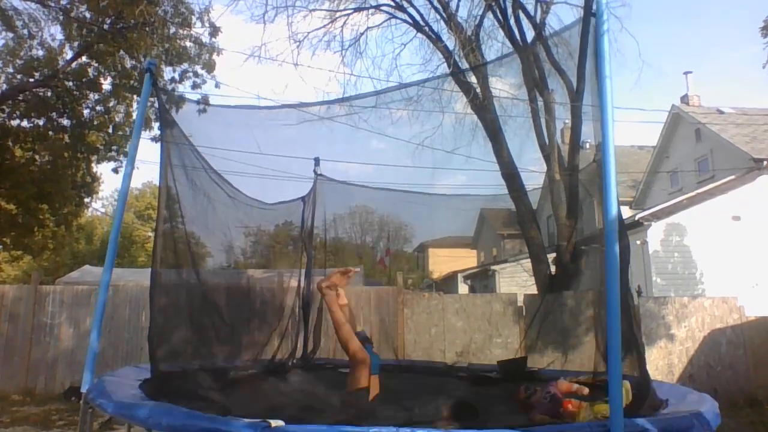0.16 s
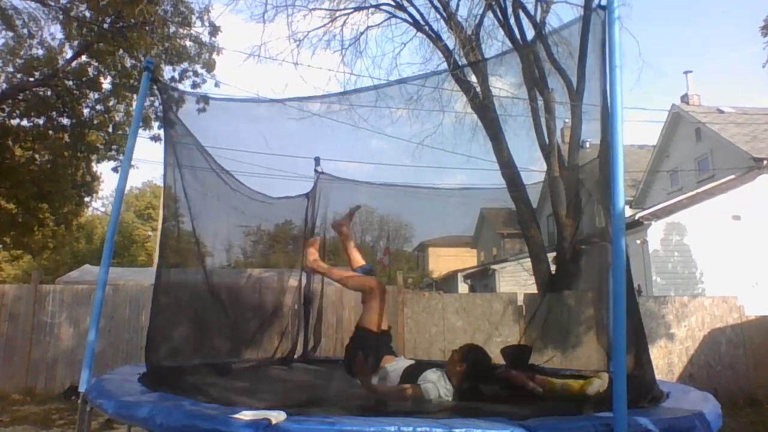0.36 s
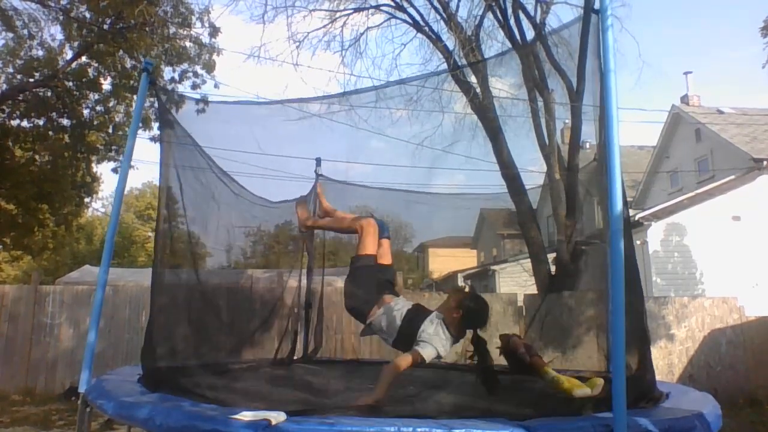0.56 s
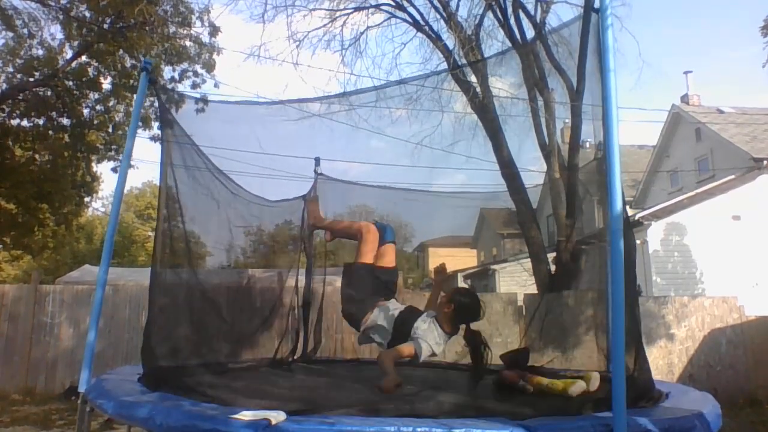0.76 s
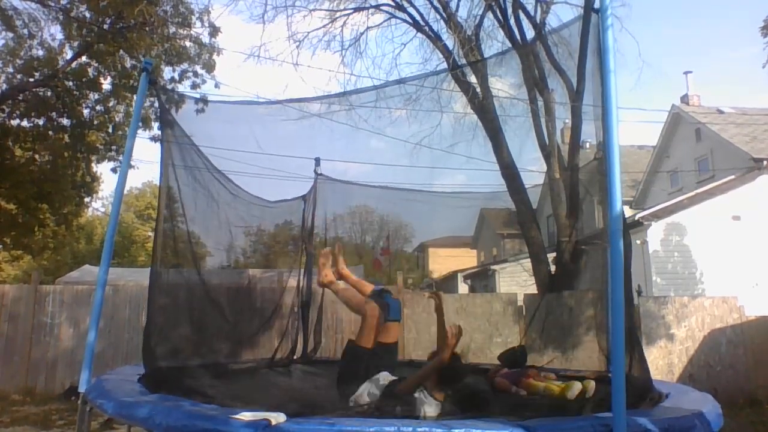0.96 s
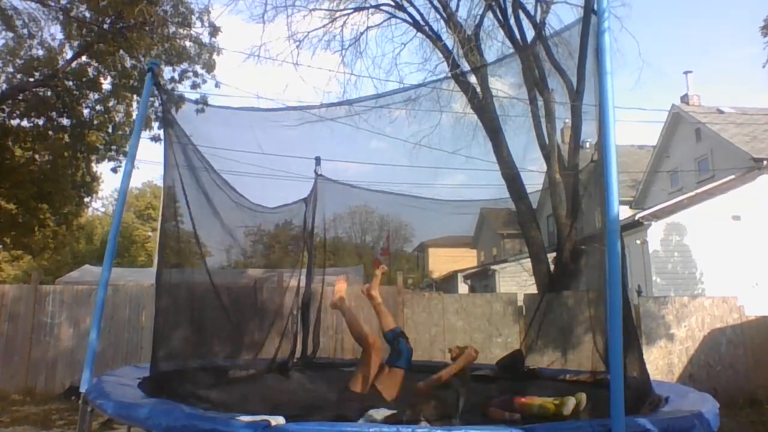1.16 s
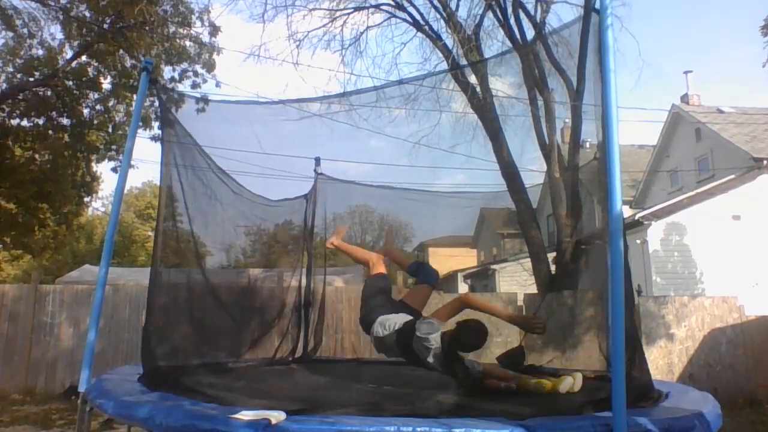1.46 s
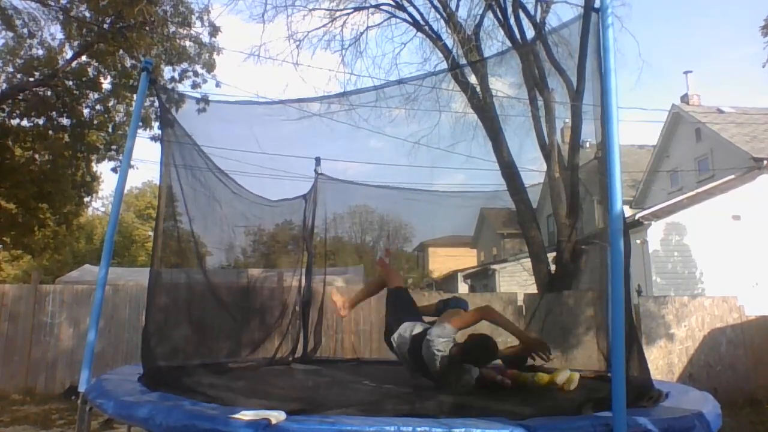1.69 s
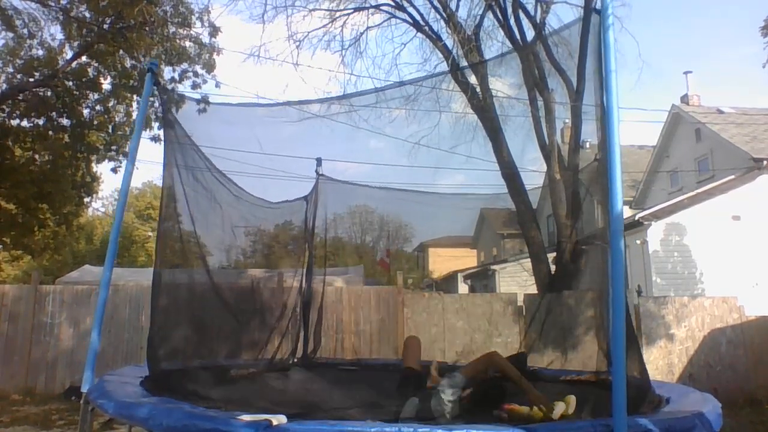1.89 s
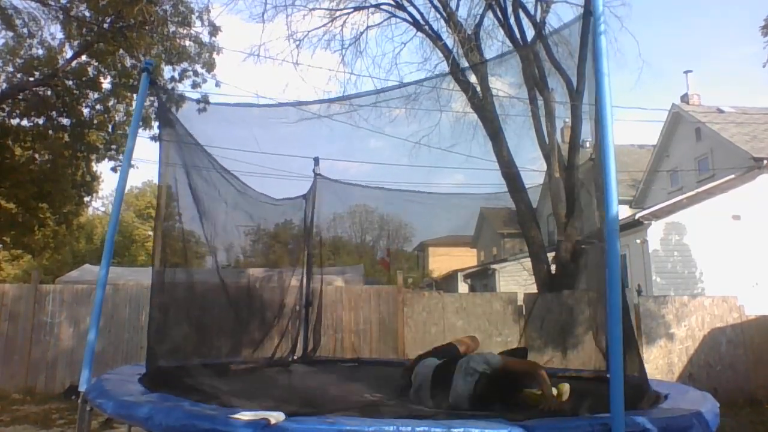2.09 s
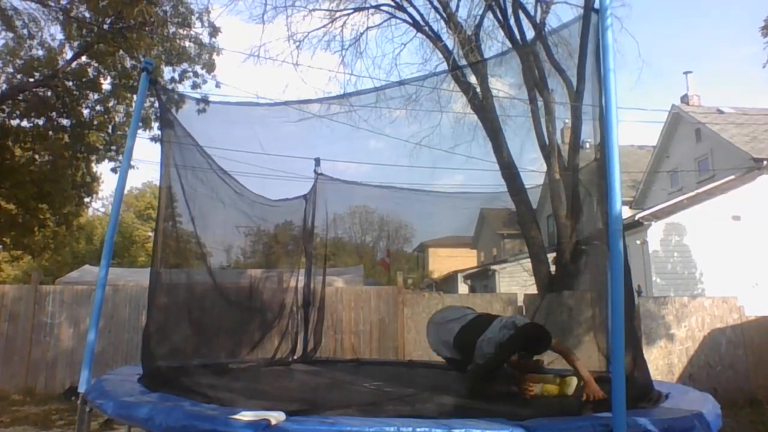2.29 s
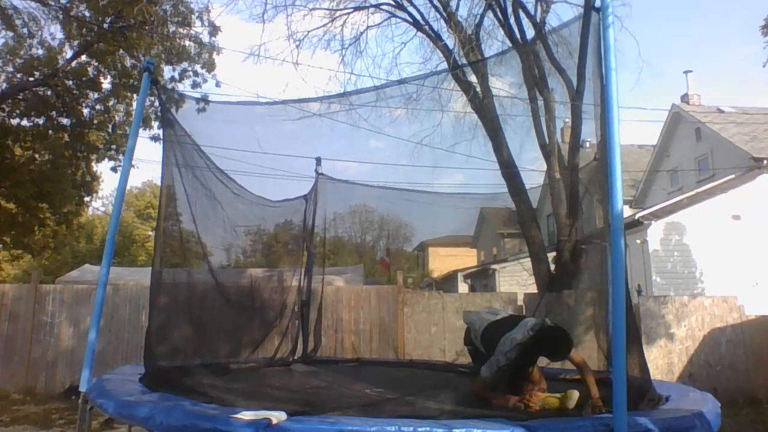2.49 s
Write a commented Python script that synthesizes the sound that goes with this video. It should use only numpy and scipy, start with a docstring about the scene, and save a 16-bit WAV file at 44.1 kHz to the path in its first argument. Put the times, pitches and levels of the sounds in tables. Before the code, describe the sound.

A body thuds onto a trampoline, springs rasping and frame knocking through two softer bounces.

```python
"""Garden trampoline in a quiet yard

A body drops onto the mat, rebounds and lands twice more, then rolls over, before one microphone.
The first landing thuds; the mat hums at a pitch that follows its tension, over a deep boom.
Steel springs rasp with dense stick-slip impulses as the mat sinks and again as it rises.
Hooks snap, the loose frame knocks in decaying modes and the fabric rustles as filtered slips.
The sound is mostly direct; a short echo follows thuds, knocks and snaps over faint yard air."""
import sys
import numpy as np
from scipy import signal
from scipy.fft import rfft, irfft, next_fast_len
from scipy.io import wavfile
from scipy.ndimage import map_coordinates

SR = 44100
rng = np.random.default_rng(int(sys.argv[2]) if len(sys.argv) > 2 else 0)


def transcribe(signal):
    """Save signal, clipped to [-1, 1], as a 16-bit WAV file at the path in sys.argv[1]."""
    frames = np.atleast_2d(signal).T
    limited = np.clip(frames, -1, 1)
    pcm = np.round(limited * 32767).astype(np.int16)
    wavfile.write(sys.argv[1], SR, pcm)


N = 116865
T = np.arange(N) / SR  # time in seconds


def amp(db):
    """Decibels to gain."""
    return 10 ** (np.asarray(db) / 20)


def unit(x):
    """Scale to rms 1."""
    return x / np.sqrt(np.mean(x ** 2) + 1e-20)


def noise():
    """White noise for the whole scene."""
    return rng.standard_normal(N)


def colour(points, hz):
    """Gain interpolated between (Hz, dB) points on a log frequency axis."""
    f, db = np.transpose(points)
    return amp(np.interp(np.log(hz + 1), np.log(f + 1), db))


def filtered(x, response):
    """Multiply the spectrum of x by a response of frequency."""
    m = next_fast_len(N + SR // 2)
    return irfft(rfft(x, m) * response(np.fft.rfftfreq(m, 1 / SR)), m)[:N]


def wobble(rate):
    """A smooth random curve with rate knots a second."""
    return map_coordinates(rng.standard_normal(int(N * rate / SR) + 4), [T * rate])


def uneven(hz, width):
    """Random bumps along the frequency axis, one knot every width Hz."""
    return map_coordinates(rng.standard_normal(4096), [hz / width], mode="wrap")


def slips(rate, spread_db):
    """Tiny stick-slip impulses of random sign and uneven size, rate a second on average."""
    happens = rng.random(N) < rate / SR
    sign = rng.choice([-1, 1], N)
    return happens * sign * amp(spread_db * rng.standard_normal(N))


def held(start, end, attack, release):
    """Rise exponentially until start, hold until end, then die away."""
    return np.exp(np.minimum(T - start, 0) / attack - np.maximum(T - end, 0) / release)


# Still air of the yard. Each row: frequency in Hz, gain in dB.
AIR_COLOUR = [(200, 1.5), (400, -8), (2500, -15), (8000, -30.5)]
AIR_DB = -81.5


def air():
    """Steady noise, darker towards the treble, lies under everything."""
    return amp(AIR_DB) * unit(filtered(noise(), lambda hz: colour(AIR_COLOUR, hz)))


ECHO_DB, ECHO_T60_S, ECHO_DELAY_S = -19, .18, .008


def yard(x):
    """Fence and house wall scatter a short echo, a decaying noise tail of set energy."""
    tail = rng.standard_normal(N) * amp(-60 * T / ECHO_T60_S) * (T > ECHO_DELAY_S)
    echo = signal.fftconvolve(x, tail / np.linalg.norm(tail))[:N]
    return x + amp(ECHO_DB) * echo


# Clothes sliding on the mat. Each row: start in seconds, end in seconds,
# level in dB before the quick wobble.
RUSTLES = [(.254, .715, -70.5), (1.13, 1.645, -74.5), (2.019, 2.4, -65), (2.43, 2.5, -77),
           (2.624, 2.7, -71)]
# Colour of the rustle. Each row: frequency in Hz, gain in dB.
FABRIC_COLOUR = [(200, -10), (1600, -3), (4500, -8.5), (7000, 2), (8200, -4.5), (9000, -20)]
RUSTLE_ATTACK_S, RUSTLE_RELEASE_S = 0.0046, .022  # time constants


def fabric():
    """Clothes and mat rustle in fine slips of wavering level while they touch."""
    envelope = sum(amp(db) * held(start, end, RUSTLE_ATTACK_S, RUSTLE_RELEASE_S)
                   for start, end, db in RUSTLES)
    grain = slips(rate=8400, spread_db=2.5)
    rustle = unit(filtered(grain, lambda hz: colour(FABRIC_COLOUR, hz)))
    return envelope * amp(5.7 * wobble(45)) * rustle


# Knocks of the frame. Each row: time in seconds, level in dB, lift of the modes above 1 kHz in dB,
# factor on the ring times.
KNOCKS = [(.379, -35, -25, 1), (.415, -36, -19, 1), (.516, -35, -25, 1.2), (2.187, -35, -28, .65),
          (2.399, -30, 6.5, .9), (2.4275, -42, 9, 1), (2.465, -52, -1, 1.2), (2.56, -34, -20, .65),
          (2.592, -49, -25, 1)]
# Modes of the tube frame. Each row: frequency in Hz, level in dB, T60 in seconds at factor 1.
FRAME_MODES = [(135, -10, .15), (447, -7.5, .066), (547, 1, .053), (735, -9, .034), (1300, -6.5, .023),
               (1440, -3, .019), (1630, -7, .021)]
KNOCK_ATTACK_S = 0.0023
# The joints chatter on after a knock, for a multiple of the mode's T60
RATTLE_DB, RATTLE_LENGTH, RATTLE_ONSET_S = -14, 2, .012
# The padded rim answers with a dull scuff
PAD_DB, PAD_T60_S, PAD_HZ = -28, 0.3, 520


def joint_chatter(hz):
    """A loose joint keeps one mode sounding at randomly changing strength and phase."""
    sine = wobble(rate=170) * np.sin(2 * np.pi * hz * T)
    cosine = wobble(rate=150) * np.cos(2 * np.pi * hz * T)
    return sine + cosine


def frame():
    """The frame shifts in its joints and chatters under its pad; harder contacts wake upper modes."""
    out = np.zeros(N)
    scuff = unit(filtered(noise(), lambda hz: 1 / (1 + (hz / PAD_HZ) ** 8)))
    chatter = [joint_chatter(hz) for hz, _, _ in FRAME_MODES]
    for start, db, upper_db, freedom in KNOCKS:
        t = np.maximum(T - start, 0)
        knock = amp(PAD_DB - 60 * t / PAD_T60_S) * scuff
        for (hz, mode_db, t60), loose in zip(FRAME_MODES, chatter):
            ring = amp(-60 * t / (t60 * freedom)) * np.sin(2 * np.pi * hz * t)
            rattle_decay = amp(RATTLE_DB - 60 * t / (RATTLE_LENGTH * t60))
            rattle = np.minimum(t / RATTLE_ONSET_S, 1) * rattle_decay * loose
            knock = knock + amp(mode_db + upper_db * (hz > 1000)) * (ring + rattle)
        attack = 1 - np.exp(-(t / KNOCK_ATTACK_S) ** 2)
        out += amp(db) * attack * knock
    return out


# Broad colour of the steel rasp. Each row: frequency in Hz, gain in dB.
RASP_COLOUR = [(150, -2), (330, -10), (520, -1.5), (720, -9.5), (1000, -7), (1800, -2.5), (3000, -2),
               (4400, -4), (5300, -1), (7000, -8.5), (8000, -12.5), (9000, -29)]
# Resonances of the coils. Each row: centre in Hz, width in Hz, power of the peak in dB over the rasp.
COILS = [(1040, 120, 3), (2095, 60, 2.5), (2770, 80, 2), (3090, 60, 6.5)]


def steel(hz):
    """The ring of springs responds with a broad rasp and narrow coil resonances."""
    peaks = sum(amp(db) ** 2 / (1 + (2 * (hz - centre) / width) ** 2) for centre, width, db in COILS)
    return colour(RASP_COLOUR, hz) * np.sqrt(1 + peaks)


# Snaps of the spring hooks. Each row: time in seconds, level in dB.
SNAPS = [(.5495, -50), (.702, -68), (1.631, -63), (2.1504, -43)]
SNAP_T60_S = .11


def hooks():
    """A hook jumps in its eye: a short snap of noise rings through the steel."""
    envelope = sum((T > start) * amp(db - 60 * np.abs(T - start) / SNAP_T60_S) for start, db in SNAPS)
    return envelope * unit(filtered(noise(), steel))


PATCH_DB, PATCH_HZ, PATCH_S = 1.7, 300, .016  # depth and grid spacing of the flares


def patchy(x):
    """The sound flares in ever-changing bands as different coils catch and let go."""
    hz, seconds, spectrum = signal.stft(x, SR, nperseg=512)
    grid = np.meshgrid(hz / PATCH_HZ, seconds / PATCH_S, indexing="ij")
    field = map_coordinates(rng.standard_normal(spectrum.shape), grid, mode="wrap")
    return signal.istft(spectrum * amp(PATCH_DB * field))[1][:N]


# Strokes of the springs. Each row: loudest moment in seconds, rise in seconds, fall in seconds,
# level in dB before flares and wobble, low end in dB, treble in dB, singing resonance in Hz.
STROKES = [(0, .02, .018, -62, 3, 3, 6500), (.278, .016, .041, -37.5, 3, -1.5, 5900),
           (.337, .033, .028, -37, 0, -3, 2350), (.386, .018, .019, -38.5, 0, -14, 3550),
           (.437, .022, .047, -43, 6.5, -2.5, 2100), (.52, .03, .039, -46.5, 2.5, -11.5, 1900),
           (1.192, .018, .031, -45, 7, -3, 1040), (1.243, .027, .025, -39, .5, -.5, 3550),
           (1.318, .03, .03, -54, 3, -11, 1700), (1.455, .044, .033, -42.7, 1, -4, 2700),
           (2.076, .032, .042, -43.5, 0, 0, 6000), (2.135, .02, .031, -45.5, -1, 1, 5150),
           (2.304, .047, .046, -45.3, -4, 0, 4000), (2.38, .025, .022, -54, -2, 4, 5500)]
SLIPS_PER_S, SLIP_SPREAD_DB = 5000, 0.5
RISE_POWER = 1.94  # shape of the swell before its loudest moment
RING_T60_S, RING_DB = 0.62, -18.5  # the coils ring on after each stroke
# Each stroke pulls on other springs: lift and relative half-width of their resonance
SING_DB, SING_SPREAD = 4.5, .06
# These have their own narrow modes: depth, knot spacing, and where the depth becomes full
OWN_RING_DB, OWN_RING_HZ, OWN_FROM_HZ = 3, 35.18, 1700


def springs():
    """Dense slips swell and fade with each stretch or release, and the coils ring on."""
    out = np.zeros(N)
    hz = np.fft.rfftfreq(next_fast_len(N + SR // 2), 1 / SR)  # the same axis as in filtered()
    body = steel(hz)
    for peak, rise, fall, db, low_db, treble_db, sing_hz in STROKES:
        tilt = colour([(450, min(low_db, 0)), (1100, low_db), (3200, 0), (5500, treble_db)], hz)
        sing_db = SING_DB / (1 + ((hz / sing_hz - 1) / SING_SPREAD) ** 2)
        own_db = OWN_RING_DB * uneven(hz, OWN_RING_HZ) * np.minimum(hz / OWN_FROM_HZ, 1)
        response = body * tilt * amp(sing_db + own_db)
        rasp = unit(filtered(slips(SLIPS_PER_S, SLIP_SPREAD_DB), lambda _: response))
        gap = np.abs(T - peak)
        swell = np.exp(-.5 * np.where(T < peak, (gap / rise) ** RISE_POWER, (gap / fall) ** 2))
        ring = (T > peak) * amp(RING_DB - 60 * gap / RING_T60_S)
        out += amp(db) * np.maximum(swell, ring) * rasp
    return patchy(out) * amp(1.2 * wobble(120))


BOOM_HZ, WAVER_HZ = 64.23, 2.25  # centre of the deep boom, and pitch unsteadiness of every mode


def drone(hz):
    """One mode of the mat, slightly unsteady in pitch and level."""
    phase = 2 * np.pi * (np.cumsum(hz + WAVER_HZ * wobble(25)) / SR + rng.random())
    return unit(np.sin(phase) * amp(0.72 * wobble(30)))


# Tension of the mat. Each row: time in seconds, pitch of its clearest mode in Hz.
TENSION = [(.21, 128.4), (.29, 150.2), (.42, 163.5), (.54, 166.5), (.7, 154.2), (.97, 126.4), (1.17, 125.2),
           (1.62, 149.5), (2.25, 150.9), (2.45, 163.7)]
# Modes of the mat. Each row: multiple of that pitch, relative level in dB.
MAT_MODES = [(1, 3), (.84, -6.5), (.58, -2), (1.4, -14)]
# Swings under the body's weight. Each row: start in seconds, end in seconds, hum in dB, boom in dB.
SWINGS = [(0, -0.006, -65, -60.5), (0.22, 0.363, -39, -43), (.37, 0.527, -44.5, -49),
          (0.666, 0.738, -65, -60), (1.175, 1.317, -58.5, -51.5), (1.387, 1.513, -57, -53),
          (1.559, 1.648, -56.5, -65.5), (2.034, 2.14, -51, -56.5), (2.145, 2.295, -48.5, -62.5),
          (2.594, 2.7, -64, -66)]
SWING_ATTACK_S, SWING_RELEASE_S = .011, 0.052  # time constants
IDLE_HUM_DB, IDLE_BOOM_DB = -71, -71.5  # the mat never quite settles
FLUTTER_DB = -6.5  # relative to the boom tone


def mat():
    """The membrane hums higher the tauter it is, over a deep boom and a flutter of air."""
    pitch = np.interp(T, *np.transpose(TENSION))
    hum = unit(sum(amp(db) * drone(ratio * pitch) for ratio, db in MAT_MODES))
    flutter_colour = [(20, -15.5), (50, -3.5), (110, -6.5), (200, -9.5), (900, -90)]  # Hz, dB
    flutter = unit(filtered(noise(), lambda hz: colour(flutter_colour, hz)))
    boom = unit(drone(np.full(N, BOOM_HZ)) + amp(FLUTTER_DB) * flutter)
    hum_gain, boom_gain = amp(IDLE_HUM_DB), amp(IDLE_BOOM_DB)
    for start, end, hum_db, boom_db in SWINGS:
        swing = held(start, end, SWING_ATTACK_S, SWING_RELEASE_S)
        hum_gain = np.maximum(hum_gain, amp(hum_db) * swing)
        boom_gain = np.maximum(boom_gain, amp(boom_db) * swing)
    return hum_gain * hum + boom_gain * boom


# Blows of the body on the mat. Each row: time in seconds, level in dB, pitch in Hz, length in seconds.
THUDS = [(.218, -28.5, 130, .011), (.303, -25.5, 72, .028), (.324, -27, 288, .019), (.335, -25, 80, .014)]
# Dull slap of skin and cloth with each blow, its level relative to the blow
SLAP_DB, SLAP_T60_S, SLAP_HZ, SLAP_ATTACK_S = -19, 0.17, 900, 0.0029


def thuds():
    """Each blow is a soft, brief low push with a dull slap of low-passed noise."""
    out = np.zeros(N)
    slap = unit(filtered(noise(), lambda hz: 1 / (1 + (hz / SLAP_HZ) ** 6)))
    for start, db, hz, length in THUDS:
        t = np.maximum(T - start, 0)
        push = np.sin(np.pi * np.minimum(t / length, 1)) * np.sin(2 * np.pi * hz * t)
        attack = 1 - np.exp(-(t / SLAP_ATTACK_S) ** 2)
        contact = attack * amp(SLAP_DB - 60 * t / SLAP_T60_S)
        out += amp(db) * (push + contact * slap)
    return out


def scene():
    """The trampoline in still air; only the short, hard sounds stir the yard's echo."""
    struck = yard(frame() + hooks() + thuds())
    return (air() + fabric() + struck + springs() + mat())[None]


TOP_HZ = 9170  # band limit of the microphone


def record(dry):
    """The microphone rolls off in the top treble and keeps nothing above its band limit."""
    rolloff = [(7800, 0), (8500, -4), (9200, -15)]  # Hz, dB
    return filtered(dry[0], lambda hz: colour(rolloff, hz) * (hz < TOP_HZ))[None]


dry = scene()
out = record(dry)
transcribe(out)
```